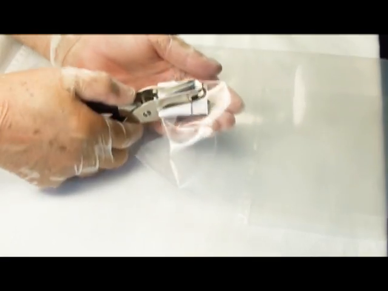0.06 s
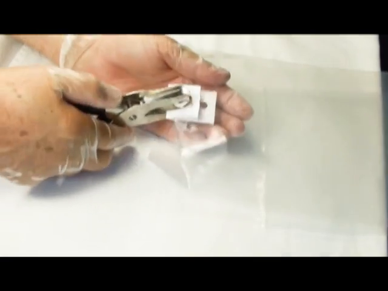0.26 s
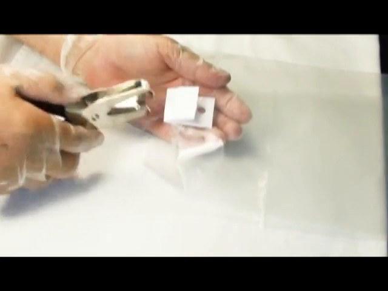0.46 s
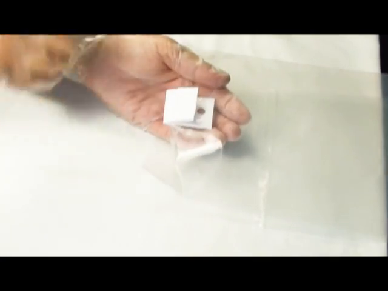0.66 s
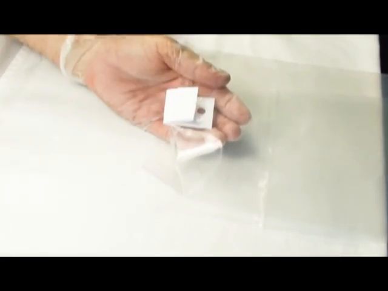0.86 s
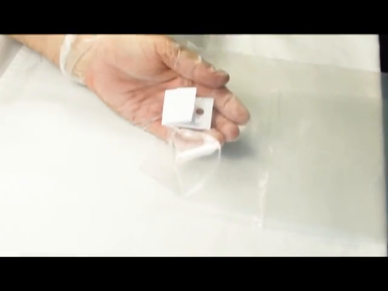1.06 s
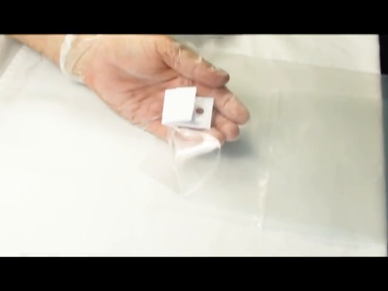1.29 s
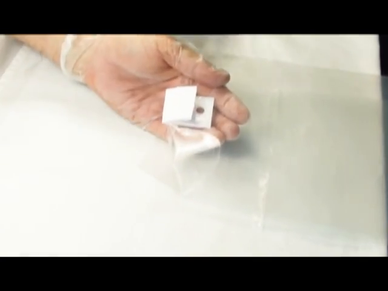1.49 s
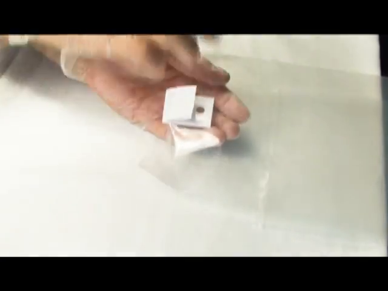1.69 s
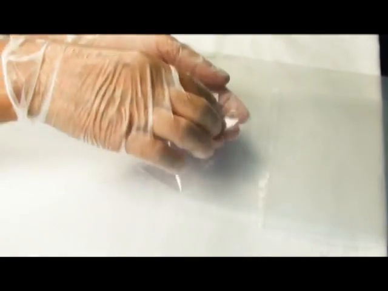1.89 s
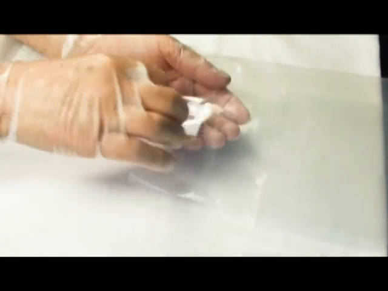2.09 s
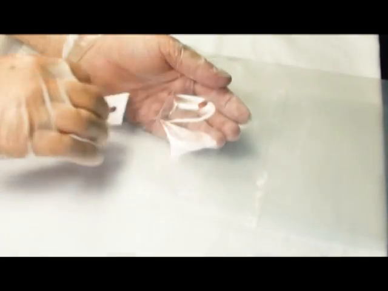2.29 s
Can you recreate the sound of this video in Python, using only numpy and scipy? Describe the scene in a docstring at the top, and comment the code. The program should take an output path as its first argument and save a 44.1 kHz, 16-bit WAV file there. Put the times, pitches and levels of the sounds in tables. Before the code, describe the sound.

A steel hand punch creaks and snaps through a card and a plastic bag, close by in a small room. It ticks and is set down with a light clink, then the bag rustles and pops under the fingers.

```python
"""A steel hand punch bites through a card and a plastic bag, close to the microphone in a small room.
The card creaks, gives way with a snap and scrapes off the pin; the punch ticks and is laid aside with a clink.
Then fingers pick up the card, and the bag rustles and pops."""
import sys
import numpy as np
from scipy import signal
from scipy.fft import rfft, irfft
from scipy.io import wavfile
from scipy.ndimage import uniform_filter1d

SR = 44100
rng = np.random.default_rng(int(sys.argv[2]) if len(sys.argv) > 2 else 0)


def wrap_up_sound(samples):
    """Save the sound to the file named by the first command line argument, as 16-bit audio."""
    columns = np.atleast_2d(samples).T
    # keep every value between -1 and 1, then stretch to whole-number steps
    tamed = np.clip(columns, -1, 1)
    steps = np.round(tamed * 32767).astype(np.int16)
    wavfile.write(sys.argv[1], SR, steps)


N = 108045

# punch clicks (s, level dB, tilt dB per octave, t60 s, strongest resonance Hz)
CLICKS = [(0.052, -43, 3.5, 0.031, 9800), (0.0768, -32, 4.2, 0.022, 4400), (.1184, -20.5, 1, 0.022, 2520), (.1204, -19.5, 0.1, 0.027, 11900),
          (0.1567, -34.5, -3, 0.0062, 4000), (0.2282, -32, -0.5, 0.0086, 1100), (0.3194, -39.5, -3.3, 0.036, 900)]
CLICK_COLOUR = [(200, -22), (600, -15.5), (970, -5.5), (1230, -10), (2000, 2), (3050, -5.5), (4000, 1), (4900, -6), (6300, -3), (9000, -10.5), (11500, -9), (15500, -26)]  # (Hz, dB)
# steel jaws and handles, damped by the hand (Hz, dB, t60 s)
JAWS = [(1950, 1, .09), (2077, -2, .16), (2620, 1, .09), (3170, -4, .07), (3565, -3, .11), (4122, -1, .08), (5233, -2, .07),  # fixed
        (5870, -6, .14), (6090, -2, .12), (6280, -2, .09), (6540, -3, .1), (7870, -9, .11), (8540, -11, .14), (11660, -5, .04)]  # fixed
JAWS_DB = -8.5
# slips of the pin through the card (s, level dB)
SLIPS = [(0.0897, -41), (0.0964, -36), (.1014, -36), (.1075, -34.5), (.1165, -31)]
# card and bag sliding on the jaws (s, level dB)
SCRAPE = [(.01, -60), (.05, -65), (.07, -46.5), (.092, -39.5), (.112, -44), (.135, -37), (.157, -38), (.19, -49.5), (.26, -48), (.312, -48), (.345, -57), (.415, -55), (.46, -97)]
SCRAPE_COLOUR = [(150, -19.5), (450, -3), (1200, -3), (2100, -0.5), (4500, -7), (6500, -3), (9500, -8.5), (12500, -10.5), (15500, -23)]  # (Hz, dB)
# light taps of the loose punch (s, level dB, tilt dB per octave, t60 s, strongest resonance Hz, ringing dB)
TAPS = [(0.6865, -44, 4.5, 0.012, 4600, -25), (0.936, -59, -5, 0.017, 4630, -20), (1.406, -49.5, -4.5, 0.095, 1620, -13), (1.4481, -36.5, 0, 0.011, 4520, -3.5),
        (1.4523, -42.5, -5.5, 0.065, 1300, -17), (1.53, -52, -3, .04, 6000, -20), (1.58, -52.5, -9.5, 0.032, 4340, -25), (1.734, -54, 8, 0.096, 4500, -5)]
TAP_COLOUR = [(300, -29), (1300, -12.5), (2000, -14.5), (2800, -5.5), (3700, -12.5), (4500, -7), (5400, -8.5), (6600, -3.5), (7500, -7.5), (9800, -8.5), (11500, -7), (15500, -23)]  # (Hz, dB)
# the steel ringing freely (Hz, dB, t60 s)
RING = [(1303, -4, .27), (3400, -12, .3), (4167, -9, .35), (6153, -3, .36), (6621, 1, .22), (8716, -10, .35), (9367, -11, .35),  # fixed
        (10917, -7, .2), (11170, -8, .26), (11466, -6, .22), (11989, -4, .27), (13480, -8, .28), (14260, -11, .22), (15202, -5, .19)]  # fixed
# pops of the bag (s, level dB, tilt dB per octave, t60 s, strongest resonance Hz)
POPS = [(1.9435, -40, -1.5, 0.056, 1570), (2.0438, -37.5, 0.7, 0.031, 3550), (2.067, -47, 3, 0.022, 3500), (2.0899, -29, -0.5, 0.03, 780), (2.145, -43.5, -3, 0.031, 2200),
        (2.159, -42.5, -0.5, 0.018, 2000), (2.1941, -30.5, 3.3, 0.032, 1780), (2.431, -52.5, 4, 0.017, 1300)]
POP_COLOUR = [(200, -19), (600, -17), (840, -3), (1300, -9), (1850, 1), (2900, -5), (3700, -5), (6000, -9), (11000, -19.5), (15500, -38)]  # (Hz, dB)
# fingers and card rubbing over the bag (s, level dB, tilt dB per octave)
RUSTLE = [(1.929, -61, -1), (1.959, -50, -1.5), (2.0, -58, 0), (2.035, -51.5, -2.5), (2.075, -51, -1.5), (2.11, -57, -1.5), (2.15, -46.5, -0.5), (2.173, -47, -0.5),
          (2.181, -38.5, 1.5), (2.195, -32, -0.5), (2.212, -59, 0), (2.235, -50, -1), (2.27, -67, 2), (2.361, -63, -4.5)]
RUSTLE_COLOUR = [(200, -11.5), (800, 2), (2000, 1), (4000, -0.5), (7000, -2.5), (11500, -3.5), (15500, -15)]  # (Hz, dB)
AIR = [(20, -16), (36, -2), (55, -6.5), (90, -1.5), (145, -1.5), (200, -6), (290, -6), (390, -11.5), (630, -13.5), (780, -16.5), (1400, -18), (2700, -23), (6000, -28), (15500, -37)]  # (Hz, dB per Hz)
AIR_DB = -50.5
AIR_SAME = [(100, 1), (250, 1), (500, 0.75), (2000, 0.29), (8000, 0.41), (13000, 1)]  # (Hz, left-right likeness)
ROOM_T60 = [(300, 0.27), (2000, 0.23), (7000, 0.32), (15000, 0.18)]  # (Hz, s)
EDGE_HZ = 15900  # fixed
SLIP_COLOUR, SLIP_T60, SLIP_HZ = [(300, -24), (1400, -4), (2500, 4), (3300, 2.5), (4500, -18), (15000, -23)], 0.014, 2450  # (Hz, dB), s, Hz
# steady tones of the ventilation (Hz, dB)
HUM = [(240, -60), (646, -69.5), (1330, -74.5)]
HUM_HZ = None
HUM_DB = None
CONTACT_RISE_S = 0.00025
ROOM_DB, ROOM_DELAY_S, TABLE_DB = -12, 0.0046, -12
TABLE_T60 = .02  # fixed
THUD_S, THUD_DB, THUD_HZ, THUD_T60 = 1.45, -47, 141, 0.45


def amp(db):
    """Decibels to gain."""
    return 10 ** (np.asarray(db) / 20)


def evened(x):
    """Scales to rms 1."""
    return x / np.sqrt(np.mean(x ** 2) + 1e-20)


def blow(x):
    """Scales a hit to the energy of 5 ms at rms 1."""
    return x * np.sqrt(.005 * SR / np.sum(x ** 2))  # fixed


def read(points, hz):
    """Reads a spectrum on a log-frequency axis."""
    f, value = np.transpose(points)
    return np.interp(np.log(hz + 1), np.log(f), value)


def add(mix, s, sound):
    """Mixes a sound in at a time."""
    part = mix[round(s * SR):][:len(sound)]
    part += sound[:len(part)]


def colour(x, points, tilt=0, size=2048):
    """Causal filter with the given spectrum, tilted in dB per octave."""
    hz = abs(np.fft.fftfreq(size, 1 / SR))
    log_gain = np.log(amp(read(points, hz) + tilt * np.log2(np.maximum(hz, 500) / 3000)))  # fixed
    taps = np.fft.ifft(np.exp(np.conj(signal.hilbert(log_gain)))).real
    return signal.fftconvolve(x, taps[:size // 2])[:len(x)]


def crack(points, tilt, t60, peak_hz, peak_db=7, q=7, size=4096, count=70):
    """A contact that dies in milliseconds: dense, heavily damped modes, one of them standing out."""
    t = np.arange(size) / SR
    fade = amp(-60 * t / t60) * (1 - np.exp(-(t + 1 / SR) / CONTACT_RISE_S))
    z = rfft(rng.choice([-1., 1.], size) * np.sqrt(fade))
    z /= np.sqrt(uniform_filter1d(abs(z) ** 2, count))
    body = colour(irfft(z) * np.sqrt(fade), points, tilt)
    return blow(body + (amp(peak_db) - 1) * signal.lfilter(*signal.iirpeak(peak_hz, q, SR), body))


def ring(modes):
    """Dying sines of a struck piece of steel."""
    t = np.arange(SR // 2) / SR
    return blow(sum(amp(db - 60 * t / t60) * np.sin(2 * np.pi * (hz * t + rng.random())) for hz, db, t60 in modes))


def friction(curve, points, tilt, per_s, spread_db, hiss_db):
    """Tiny catches of uneven size over a smooth hiss, under a level curve."""
    size = amp(spread_db * np.minimum(rng.exponential(1, N), 4))  # fixed
    catches = evened(size * rng.choice([-1, 1], N) * (rng.random(N) < per_s / SR))
    drive = catches + amp(hiss_db) * rng.standard_normal(N)
    s, db = np.transpose(curve)[:2]
    return evened(colour(drive, points, tilt)) * amp(np.interp(np.arange(N) / SR, s, db, left=-120, right=-120))


def punch():
    """The pin slips through the card, snaps home, scrapes and springs back."""
    out = friction(SCRAPE, SCRAPE_COLOUR, 0, per_s=2800, spread_db=1.5, hiss_db=-1)
    for s, db in SLIPS:
        add(out, s, amp(db) * crack(SLIP_COLOUR, 0, SLIP_T60, SLIP_HZ, q=2.7))
    for s, db, tilt, t60, hz in CLICKS:
        add(out, s, amp(db) * crack(CLICK_COLOUR, tilt, t60, hz))
        add(out, s, amp(db + JAWS_DB) * ring(JAWS))
    return out


def laid_aside():
    """The loose punch ticks, and rings when it meets the table, which answers with a soft thud."""
    out = np.zeros(N)
    for s, db, tilt, t60, hz, ring_db in TAPS:
        add(out, s, amp(db) * crack(TAP_COLOUR, tilt, t60, hz, peak_db=13.5, q=18))
        add(out, s, amp(db + ring_db) * ring(RING))
    t = np.arange(SR // 2) / SR
    add(out, THUD_S, amp(THUD_DB - 60 * t / THUD_T60) * np.sin(2 * np.pi * THUD_HZ * t))
    return out


def bag():
    """The film rustles, brighter as the card slides faster, and buckles in short pops."""
    rub = friction(RUSTLE, RUSTLE_COLOUR, 0, per_s=2000, spread_db=8, hiss_db=3)
    hz, t, z = signal.stft(rub, SR, nperseg=256)  # fixed
    s, _, tilt = np.transpose(RUSTLE)
    z *= amp(np.log2(np.maximum(hz, 500) / 4000)[:, None] * np.interp(t, s, tilt))  # fixed
    out = signal.istft(z, SR)[1][:N]
    for s, db, tilt, t60, hz in POPS:
        add(out, s, amp(db) * crack(POP_COLOUR, tilt, t60, hz))
    return out


def air():
    """Steady ventilation rumble with a faint hum and whine."""
    hz = np.fft.rfftfreq(N, 1 / SR)
    a, b = rfft(rng.standard_normal((2, N))) * amp(read(AIR, hz))
    same = np.clip(read(AIR_SAME, hz), -1, 1)
    mid, side = a * np.sqrt(1 + same), b * np.sqrt(1 - same)
    hum = sum(amp(db) * np.sqrt(2) * np.sin(2 * np.pi * tone_hz * np.arange(N) / SR) for tone_hz, db in HUM)
    return amp(AIR_DB) * evened(irfft([mid + side, mid - side], N)) + hum


def room(x, width=0.5):
    """Quick reflections off the table widen each click; a short room tail follows."""
    t = np.arange(SR // 2) / SR
    hz, frame_s, z = signal.stft(rng.standard_normal((2, len(t))), SR, nperseg=256)  # fixed
    tail = signal.istft(z * amp(-60 * frame_s / read(ROOM_T60, hz)[:, None]), SR)[1][:, :len(t)] * (t > ROOM_DELAY_S)
    mid, side = amp(ROOM_DB) * tail / np.linalg.norm(tail[0])
    table = rng.standard_normal(len(t)) * amp(-60 * t / TABLE_T60)
    side = width * side + amp(TABLE_DB) * table / np.linalg.norm(table)
    return x + signal.fftconvolve(x[None], np.array([mid + side, mid - side]), axes=1)[:, :N]


def scene():
    """Punch and bag in the room."""
    return room(punch() + laid_aside() + bag()) + air()


def record(dry):
    """The recorder's band limit."""
    return signal.oaconvolve(dry, signal.firwin(511, EDGE_HZ, window=("kaiser", 9), fs=SR)[None], "same")  # fixed


dry = scene()
out = record(dry)
wrap_up_sound(out)
```